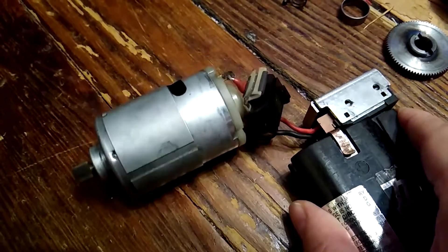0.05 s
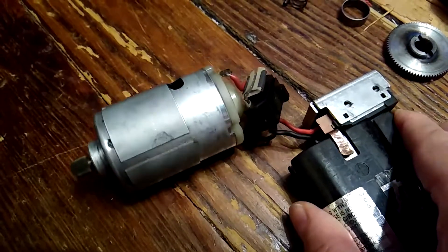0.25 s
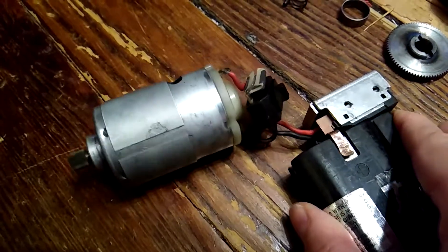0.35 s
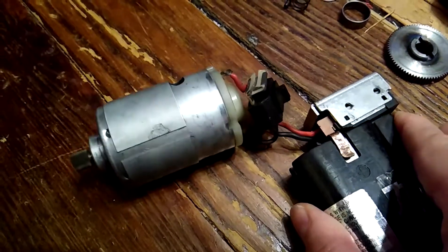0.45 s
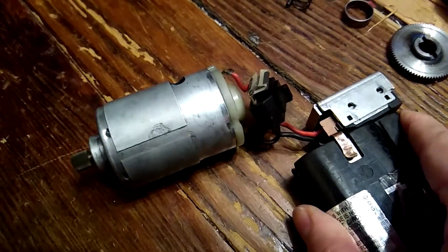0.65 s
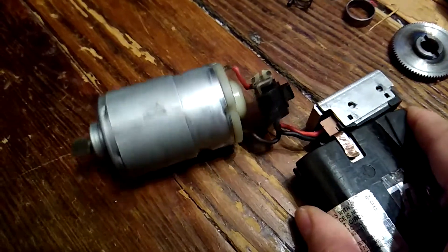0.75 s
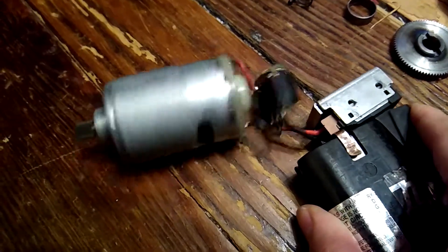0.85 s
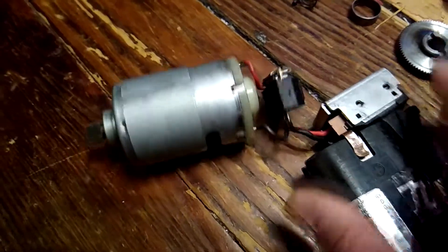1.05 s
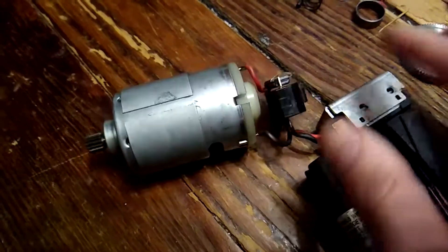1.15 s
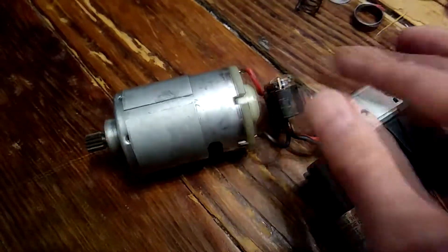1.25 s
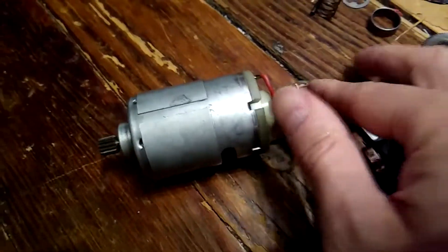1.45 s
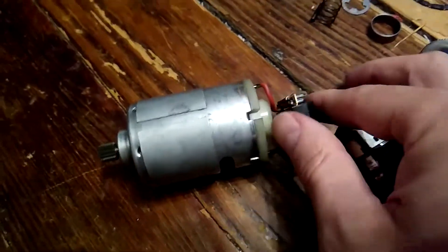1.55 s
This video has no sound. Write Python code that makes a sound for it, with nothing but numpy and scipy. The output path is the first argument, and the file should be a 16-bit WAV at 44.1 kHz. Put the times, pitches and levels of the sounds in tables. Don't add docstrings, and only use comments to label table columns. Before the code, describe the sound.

A small bare electric motor spins up in a raspy rising whir, holds a moment, drops and stops with a hard woody clunk; then faint ticks as a hand shifts parts, close up in a quiet room.

```python
import sys
import numpy as np
from scipy import signal
from scipy.fft import rfft, irfft
from scipy.io import wavfile
from scipy.ndimage import uniform_filter1d

SR = 44100
rng = np.random.default_rng(int(sys.argv[2]) if len(sys.argv) > 2 else 0)


def nominal_scale(level):
    x = np.asarray(level, float) / 20
    return 10 ** x


def bounce(signal):
    frames = np.transpose(np.atleast_2d(signal))
    limited = np.clip(frames, -1, 1)
    pcm = np.round(limited * 32767).astype(np.int16)
    wavfile.write(sys.argv[1], SR, pcm)


N = 70560

# (time [s], turns per second [1/s])
SHAFT_SPEED = [(0.1, 45.8), (0.128, 55.3), (0.16, 66.0), (0.2, 79.6), (0.248, 94.8), (0.3, 110.5),
               (0.358, 122.6), (0.394, 128.6), (0.502, 138.6), (0.626, 144.5), (0.718, 145.8),
               (.733, 143.9), (.762, 138.3), (.804, 126.4), (.846, 111.1), (.878, 104.8), (.906, 96.5),
               (0.98, 72.4)]
# (time [s], unbalance hum [dB], whine [dB])
MOTOR_LEVEL = [(0, -100, -69), (.06, -100, -70), (0.092, -99, -52.5), (.18, -76, -44.5), (.24, -70, -37),
               (0.309, -45, -38.5), (.36, -42, -37), (.41, -37, -39), (0.501, -32.5, -37.5),
               (0.602, -33.5, -38.5), (0.718, -27.5, -38), (.76, -34.5, -38.5), (0.807, -38.5, -38.5),
               (.86, -94, -37), (.905, -75, -38), (0.931, -86, -45.5), (.97, -82.5, -55.5),
               (1.03, -88.5, -70.5)]
# (multiple [1], level [dB], share of the hum's swing [1])
HUM_ORDERS = [(1, 3.5, 0.69), (2, -8.5, 0.59), (3, -15.5, 0.37), (4, -21, 0.28), (12, -24.5, .8)]
# (frequency [Hz], level [dB])
COG_TONE = [(780, -95), (880, -41.5), (950, -39), (1020, -48), (1100, -41.5), (1175, -39.5), (1240, -55),
            (1290, -46), (1320, -44.5)]
# (order [1], extra while speed changes [dB], extra at full speed [dB])
STRONG_ORDERS = [(5, -5, -3.5), (6, -1.5, -1), (7, -1, -3), (8, -10, -2.5), (9, -17, -6), (10, -6.5, 0.5),
                 (12, 3, -2), (18, -9, 2.5), (21, -3, -2.5), (22, 0, -5.5), (23, -0.5, -6.5),
                 (24, 3.5, -3.5), (25, -7, -3), (26, -2, -5.5), (27, -3, 4), (28, -9, -7), (29, -4, -5),
                 (30, 6, 7), (76, -11, 0), (81, -1.5, 1), (82, 6.5, -3), (83, -3, -13), (85, 13, 4),
                 (93, 4.5, -2)]
# (time [s], level over the hiss [dB])
BRUSH_SNAPS = [(0.0228, 22.5), (0.036, 3), (0.058, 26), (0.083, 9), (.095, -1), (0.1108, 9.5), (.124, 6),
               (0.1461, 12), (0.165, 7), (.178, 3), (0.191, 1), (0.209, 8), (0.2205, 10), (0.2902, 7)]
# (frequency [Hz], width [Hz], left [dB],
# right [dB], right leads [rad])
CAN_MODES = [(600, 1240, -7, -11, -0.13), (1192, 255, -9, -6.5, -0.2), (1800, 320, -23, -14, -2.2),
             (2200, 500, -18, -18.2, 3.12), (2600, 520, -14.5, -23.5, 3.5), (3212, 348, 1.5, -0.5, 0.49),
             (3600, 295, 2.5, 0.5, 0.1), (3993, 310, -2, -1.5, 1.5), (4760, 1420, -4.5, -10.5, -2.5),
             (5910, 630, -8, -6.5, 1.5), (6460, 105, -6, -2.5, 4), (6850, 400, -13, -13.2, 3.12),
              (7450, 450, -19, -20, -1.2), (8200, 940, -9, -23, 1), (10470, 1700, -14, -21, 1.2),
              (11100, 350, -6, -11, -.6), (11900, 450, -.5, -8, 1.2), (12550, 250, -13, -13, 2.9),
              (13060, 4450, -10, -10, 1.5)]
# (frequency [Hz], level [dB], decay to -60 dB [s])
BENCH_MODES = [(160, -32, 0.1), (222.7, 12, 0.045), (266.7, 11, 0.047), (316, 3, 0.1), (417, 0.5, 0.029),
               (509, 0.5, 0.043), (606, 9, 0.023), (783, 5.5, 0.0073), (990, -41.5, 0.028),
               (1212, -8, 0.076), (1590, -38, 0.023)]
# (time [s], level [dB], contact [ms])
KNOCKS = [(0.019, -43.5, 4.5), (0.082, -58, 0.051), (0.096, -56, 1.05), (0.2232, -44, .7),
          (0.232, -38.5, 0.83), (0.2518, -41.5, 1), (0.851, -41, 0.37), (.868, -40.5, 0.64),
          (0.9169, -31, 1.07), (0.9213, -34, 3.6), (0.9293, -27.5, 1.12), (0.9343, -29, 2.13),
          (0.9962, -29.5, 0.76), (1.0004, -35.5, 0.88), (1.019, -36.5, 1.58), (1.089, -57, 0.27),
          (1.17, -45, 1.77), (1.175, -46.5, 1.8), (1.181, -57, 0.7), (1.194, -43.5, 1.33),
          (1.204, -62, 0.25), (1.307, -53, 6.2), (1.50, -62, 2.1), (1.518, -59, 6.3)]
# (time [s], length [s], level [dB])
ROLLS = [
    (0.083, 0.19, -68.5),
    (0.22, 0.08, -61),
    (0.315, 0.705, -65),
    (0.829, 0.11, -56.5),
    (0.931, 0.031, -55),
    (1.066, 0.18, -72.5),
]
# (time [s], level [dB], frequency [Hz], decay to -60 dB [s], rise [s])
THUDS = [(0.022, -58, 165, 0.063, .004), (0.2229, -25.5, 189, 0.12, 0.0084),
         (0.239, -34, 235, 0.11, 0.0073), (0.25, -32, 203, 0.098, 0.003), (.803, -26, 167, 0.086, .004),
         (.853, -32, 232, .12, 0.0083), (0.9236, -8, 249.3, 0.12, .012), (0.927, -18, 397, 0.068, 0.0024),
         (0.949, -27, 276, 0.095, 0.007), (1.002, -32, 252, 0.047, 0.0014), (1.307, -60, 148, 0.14, 0.0043),
         (1.516, -49.5, 146, .1, .005)]
# (time [s], level [dB], frequency [Hz], decay to -60 dB [s])
TICKS = [(0.891, -28.5, 2130, 0.046), (0.896, -41, 1200, 0.19), (0.897, -43, 2600, 0.022),
         (.958, -40.5, 3130, 0.045), (1.085, -64, 2880, 0.04), (1.105, -72, 2900, 0.024),
         (1.171, -57, 3200, 0.024), (1.185, -63, 3400, 0.019), (1.195, -78, 3300, 0.02),
         (1.204, -55.5, 3000, 0.015), (1.205, -59, 3400, 0.011), (1, -74, 6000, 0.0091),
         (1.205, -68, 4900, .01), (1.172, -71, 10000, 0.011), (1.4, -60, 3300, 0.046)]
# (frequency [Hz], level [dB], lead [rad])
RIGHT_PORT = [(60, -4, 2.2), (130, -8, 1.3), (250, -5, .85), (600, -2.5, .3), (1000, -.5, .02),
              (1600, -.5, -.9), (2200, -.5, -3.1), (3000, -2, -6.2)]
# (frequency [Hz], level per Hz [dB])
ROOM_TONE = [(45, 10), (148, -2), (700, -10.5), (1300, -13.5), (2200, -22.5), (3400, -22), (4600, -35),
             (15500, -39.5)]
# (frequency [Hz], likeness [1])
ROOM_LIKENESS = [(60, 0.39), (700, 1), (2200, 0.84), (4000, 0.36), (15000, 0.15)]

BRAKE_S = 0.908
COAST_S = 0.727


def evened(x):
    return x / np.sqrt(np.mean(abs(x) ** 2) + 1e-20)


def read(points, hz, axis=1):
    columns = np.transpose(points)
    return np.interp(np.log(hz + 1), np.log(columns[0] + 1), columns[axis])


def shaped(x, gain):
    return irfft(rfft(x, 2 * N) * gain, 2 * N)[..., :N]


def right_port(hz):
    return nominal_scale(read(RIGHT_PORT, hz)) * np.exp(1j * read(RIGHT_PORT, hz, axis=2))


def ports(x):
    hz = np.fft.rfftfreq(2 * N, 1 / SR)
    return np.array([x, shaped(x, right_port(hz))])


def motor():
    n = round(1.08 * SR)
    t = np.arange(n) / SR
    speed = uniform_filter1d(np.interp(t, *np.transpose(SHAFT_SPEED)), size=900)
    angle = 2 * np.pi * np.cumsum(speed) / SR
    lock = 1 / (1 + np.exp((117 - speed) / 12))
    ends = np.clip((n / SR - t) / 0.068, 0, 1)
    low = unbalance_hum(t, angle) + slot_tone(t, speed, angle) + bench_creep(t)
    drives = [np.pad(x, (0, N - n)) for x in brushes(t, speed, angle, lock, ends)]
    settled = np.maximum(lock, np.clip((t - COAST_S) / .05, 0, 1))
    settled = np.pad(settled, (0, N - n))
    whine = settled * can(*drives, top_db=0) + (1 - settled) * can(*drives, top_db=-12.5)
    return whine + ports(np.pad(low * ends, (0, N - n)))


def unbalance_hum(t, angle):
    s, hum_db, _ = np.transpose(MOTOR_LEVEL)
    hum, top = np.interp(t, s, hum_db), hum_db.max()
    off = np.clip((t - COAST_S) / 0.015, 0, 1)
    out = np.zeros(len(t))
    for k, db, share in HUM_ORDERS:
        coast_db = -9.5 * (k % 2 == 0) * off
        out += nominal_scale(top + db + share * (hum - top) + coast_db) * np.cos(k * angle)
    return out


def slot_tone(t, speed, angle):
    order = 9
    wobble = 1 + 0.26 * evened(uniform_filter1d(rng.standard_normal(len(t)), size=500))
    wake = np.clip(1 + (t - 0.307) / 0.033, .1, 1)
    level = nominal_scale(read(COG_TONE, order * speed)) * wobble * wake * (t < BRAKE_S + .005)
    return level * np.cos(order * angle)


def bench_creep(t):
    middle_s, span_s = .145, .045
    s, _, whine_db = np.transpose(MOTOR_LEVEL)
    swell = np.exp(-((t - middle_s) / span_s) ** 4)
    hz = 255 + 450 * (t - middle_s)
    return nominal_scale(np.interp(t, s, whine_db) - 2.5) * swell * np.cos(2 * np.pi * np.cumsum(hz) / SR)


def brushes(t, speed, angle, lock, ends):
    n = len(t)
    s, _, whine_db = np.transpose(MOTOR_LEVEL)
    k = np.arange(5, 150)[:, None]
    weight = nominal_scale(3 * (k % 3 == 0)) / (1 + (k / 125) ** 4)
    knots = np.linspace(0, t[-1], num=30)
    hats = np.maximum(1 - abs(t - knots[:, None]) / knots[1], 0)
    full = 1 / (1 + np.exp((139 - np.interp(knots, t, speed)) / 1.5))
    extra_db = sum((k == order) * (db + full * (full_db - db)) for order, db, full_db in STRONG_ORDERS)
    snap_db = sum(db * (t > at) * np.exp(-np.maximum(t - at, 0) / 0.0025) for at, db in BRUSH_SNAPS)
    hiss_level = nominal_scale(-4.5 * lock - 3 * np.interp(t, knots, full)) * nominal_scale(snap_db)
    wheel = np.exp(1j * k * angle)
    level = nominal_scale(np.interp(t, s, whine_db)) * ends
    air = nominal_scale(-10 * np.clip((t - BRAKE_S) / 0.0036, 0, 1))
    lowpass = signal.butter(2, 4420, fs=SR, output="sos")
    drives = []
    for _ in range(2):
        shape = (len(k), len(knots))
        drift = rng.standard_normal(shape) + 1j * rng.standard_normal(shape)
        start = np.exp(2j * np.pi * rng.random((len(k), 1)))
        pattern = nominal_scale(extra_db) * weight * (start + .3 * drift)
        tone = evened(((pattern @ hats) * wheel).real.sum(0))
        gate = 1 + 0.24 * np.cos(3 * angle) + 0.24 * np.cos(angle)
        hiss = rng.standard_normal(n) * gate
        x = (nominal_scale(5.5) * lock * tone + hiss_level * hiss) * level
        dull = signal.sosfiltfilt(lowpass, x)
        drives.append(dull + air * (x - dull))
    return drives


def can(a, b, top_db):
    hz = np.fft.rfftfreq(2 * N, 1 / SR)
    f, width, left_db, right_db, lead = np.transpose(CAN_MODES)[..., None]
    narrow_top = (f > 11000) * (width < 500)
    bell = nominal_scale(2 * top_db * narrow_top) / (1 + (2 * (hz - f) / width) ** 2) ** 2
    left = (bell * nominal_scale(2 * left_db)).sum(0)
    right = bell * nominal_scale(2 * right_db)
    right_sum = right.sum(0)
    alike = np.where(hz > 8600, .85, .985)
    same = alike * (right * np.exp(1j * lead)).sum(0) / right_sum
    r = np.sqrt(right_sum)
    shared, own = shaped(a, r * same), shaped(b, r * np.sqrt(1 - abs(same) ** 2))
    return np.array([shaped(a, np.sqrt(left)), shared + own]) / np.sqrt(left.mean())


def bench():
    push, burst, t = np.zeros(N), np.zeros(N), np.arange(N) / SR
    for s, db, contact_ms in KNOCKS:
        u = np.clip((t - s) * 1000 / contact_ms, 0, 1)
        push -= nominal_scale(db) * np.sin(np.pi * u) ** 2 / (contact_ms * SR / 2000)
        decay_db = -60 * np.maximum(t - s, 0) / 0.043
        burst += u * nominal_scale(db - 9 + decay_db) / np.sqrt(contact_ms)
    grit = rng.standard_normal(N) * (rng.random(N) < .02)
    grit = evened(uniform_filter1d(grit, size=24))
    for s, length, db in ROLLS:
        push += nominal_scale(db - 26.5) * grit * np.sin(np.pi * np.clip((t - s) / length, 0, 1)) ** .5
    crack_band = signal.butter(4, (305, 1465), "band", fs=SR, output="sos")
    crack = signal.sosfilt(crack_band, burst * rng.standard_normal(N))
    t = t[:SR // 5]
    ring = sum(nominal_scale(db - 60 * t / t60) * np.sin(2 * np.pi * hz * t) for hz, db, t60 in BENCH_MODES)
    return ports(signal.fftconvolve(push, .5 * ring)[:N] + 4 * crack)


def thuds():
    out, t = np.zeros(N), np.arange(SR // 20) / SR
    for s, db, hz, t60, rise in THUDS:
        swell = np.sin(np.pi / 2 * np.minimum(t / rise, 1)) ** 2
        ring = np.sin(2 * np.pi * hz * t) * (1 - t / t[-1])
        out[round(s * SR):][:len(t)] += nominal_scale(db - 60 * t / t60) * swell * ring
    return ports(out)


def ticks():
    out, t = np.zeros(N), np.arange(SR // 20) / SR
    for s, db, hz, t60 in TICKS:
        rough = evened(uniform_filter1d(rng.standard_normal(len(t)), size=30))
        grain = np.sin(2 * np.pi * hz * t) * (1 + 1.06 * rough)
        rise_s = 0.0017 if s < BRAKE_S else .0012
        out[round(s * SR):][:len(t)] += nominal_scale(db - 60 * t / t60) * np.minimum(t / rise_s, 1) * grain
    return ports(out)


def room(x):
    t = np.arange(SR // 2) / SR
    tail = rng.standard_normal((2, len(t))) * nominal_scale(-60 * t / 0.103) * (t > .006)
    tail = signal.lfilter([1], [1, -.6], tail)
    return nominal_scale(-16.5) * signal.fftconvolve(x, tail / np.linalg.norm(tail[0]), axes=1)[:, :N]


def floor():
    hz, t = np.fft.rfftfreq(2 * N, 1 / SR), np.arange(N) / SR
    a, b, c = rng.standard_normal((3, N))
    same, gain = np.clip(read(ROOM_LIKENESS, hz), 0, 1), nominal_scale(read(ROOM_TONE, hz))
    right = shaped(a, gain * same * right_port(hz)) + shaped(b, gain * np.sqrt(1 - same ** 2))
    early_db = 8 * np.clip(2 - t / 0.57, 0, 1)
    patches_db = 0.42 * evened(uniform_filter1d(c, size=1500))
    return nominal_scale(-57.5 + early_db + patches_db) * evened(np.array([shaped(a, gain), right]))


def scene():
    near = motor() + bench() + ticks() + thuds()
    return near + room(near) + floor()


def top_cut(x):
    return signal.sosfilt(signal.butter(12, 15770, fs=SR, output="sos"), x)


def record(dry):
    low_cut = signal.butter(4, 127.4, "high", fs=SR, output="sos")
    x = signal.sosfilt(low_cut, dry)
    band_limit = signal.firwin(511, 15600, window=("kaiser", 9), fs=SR)
    x = signal.oaconvolve(x, band_limit[None], "same")
    return top_cut(x)


dry = scene()
out = record(dry)
bounce(out)
```